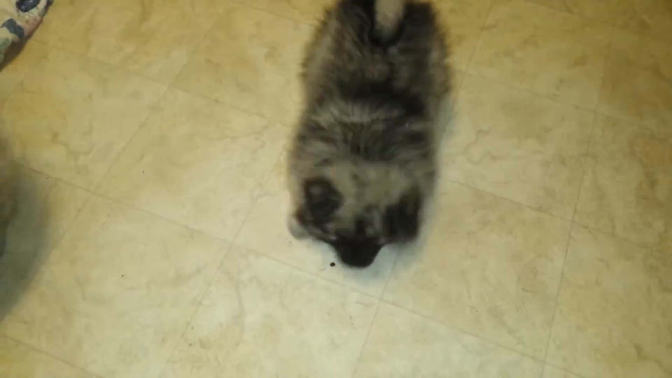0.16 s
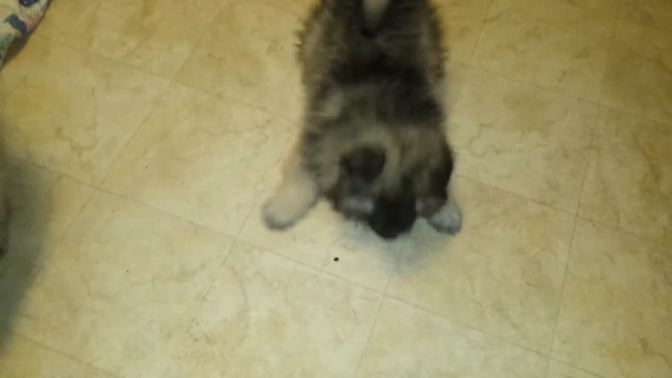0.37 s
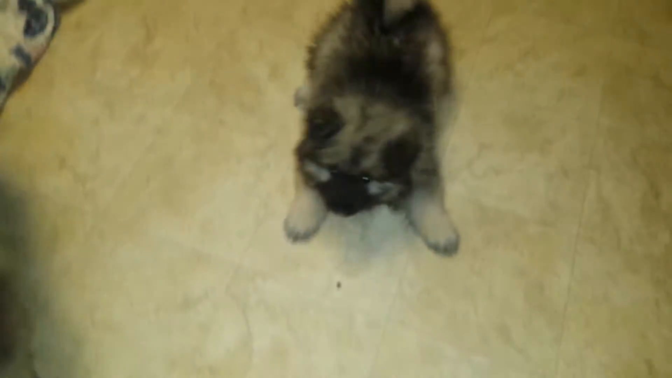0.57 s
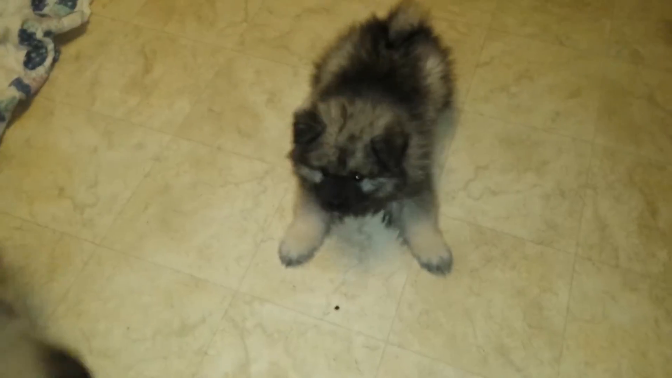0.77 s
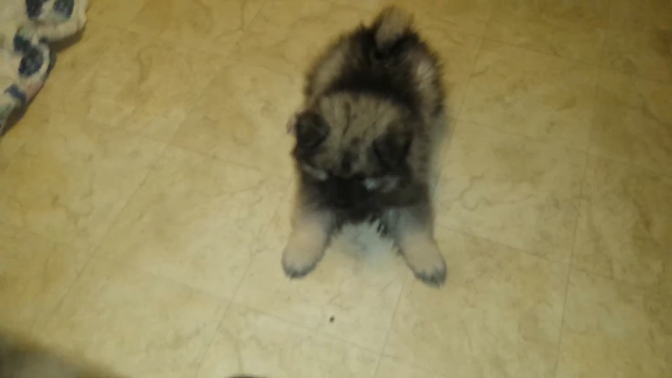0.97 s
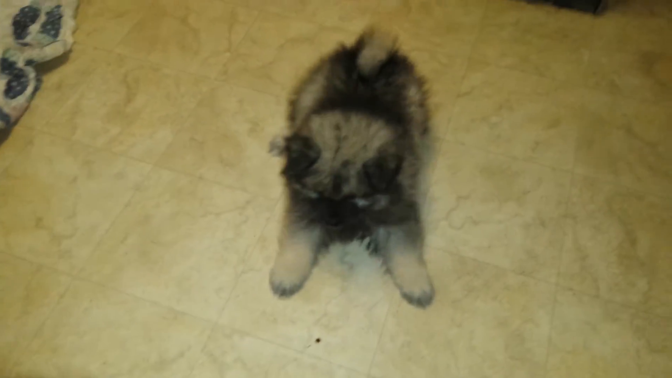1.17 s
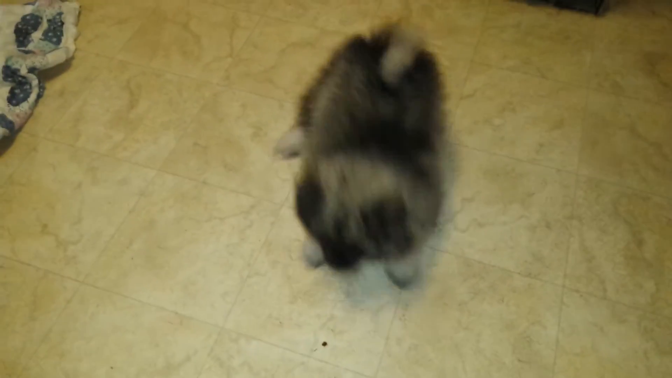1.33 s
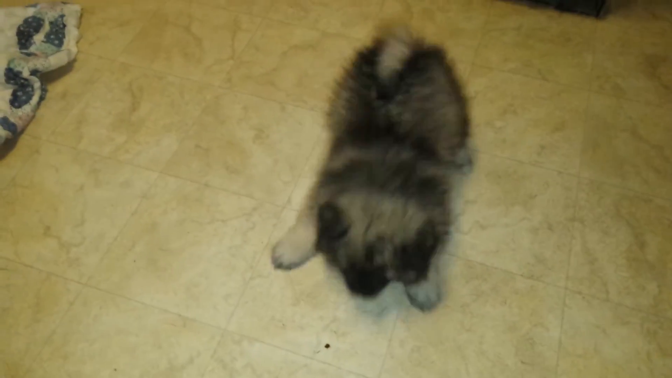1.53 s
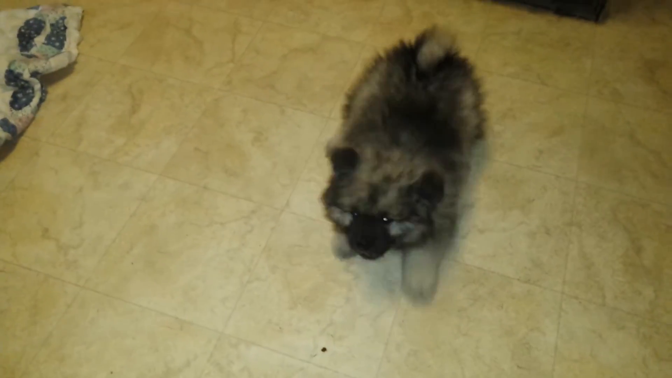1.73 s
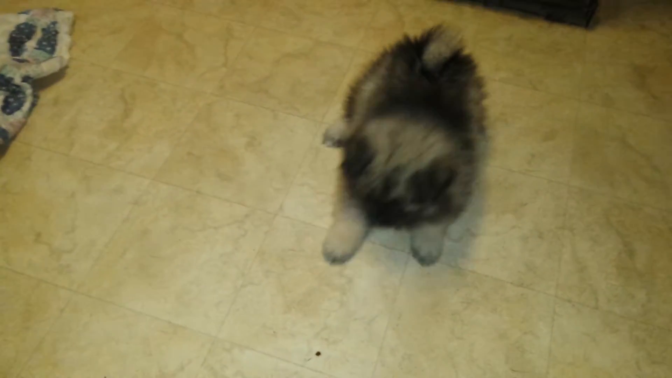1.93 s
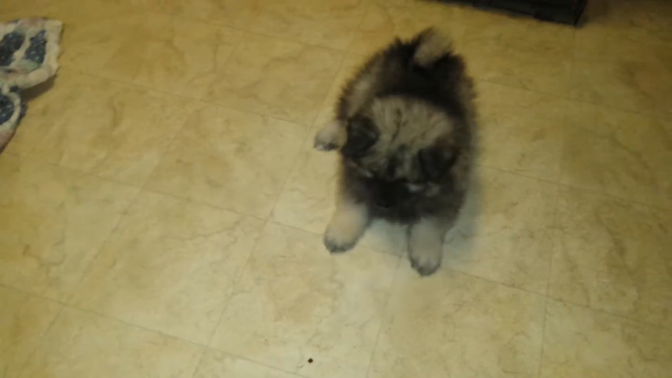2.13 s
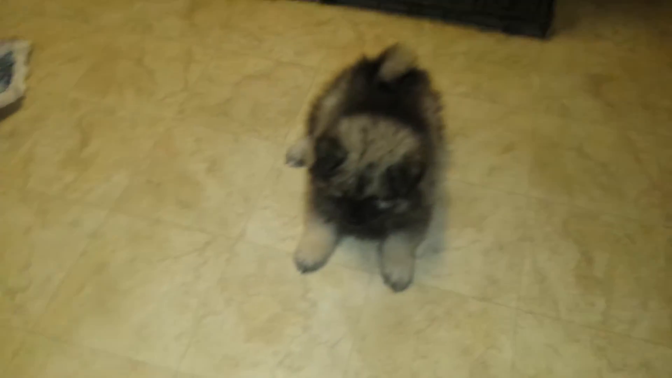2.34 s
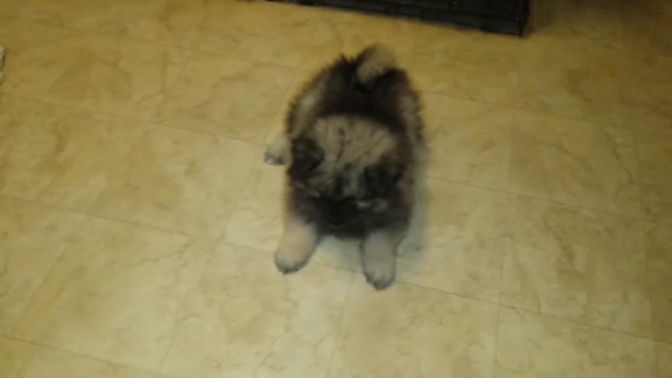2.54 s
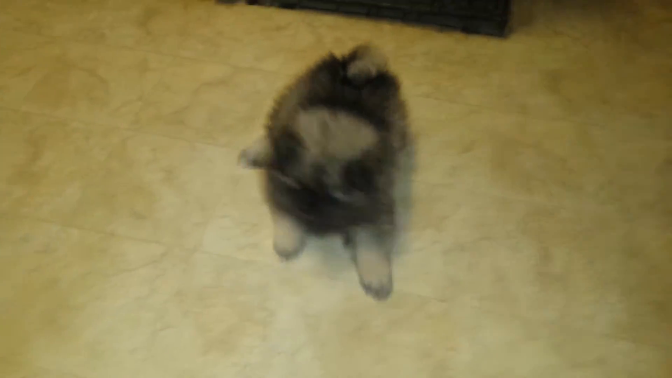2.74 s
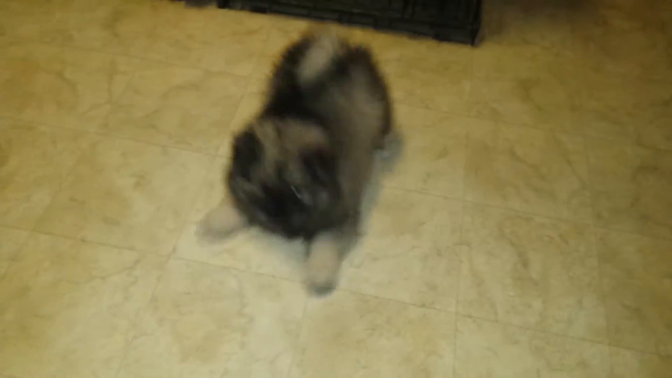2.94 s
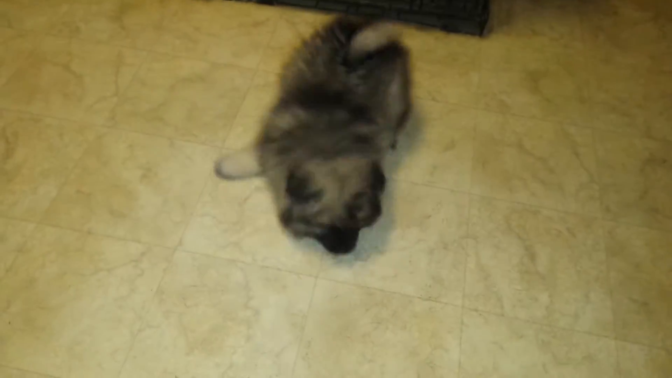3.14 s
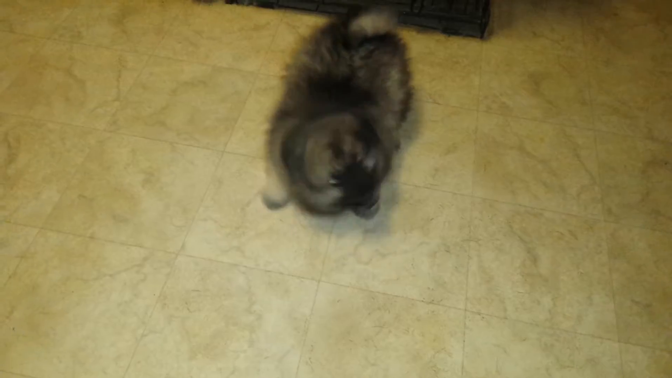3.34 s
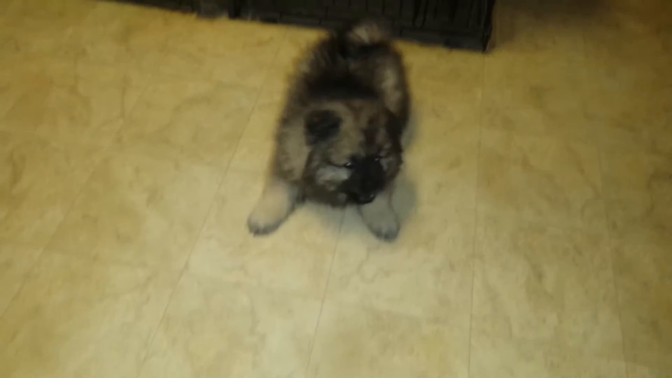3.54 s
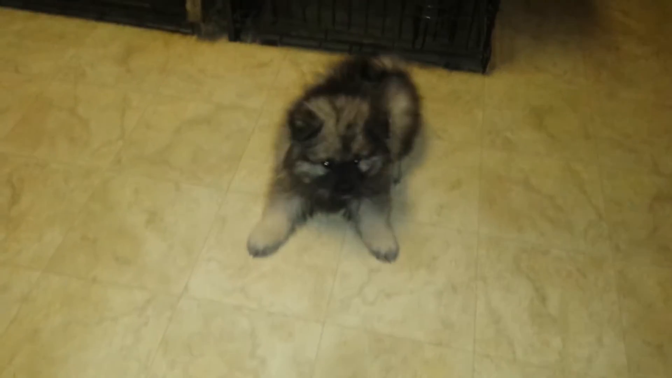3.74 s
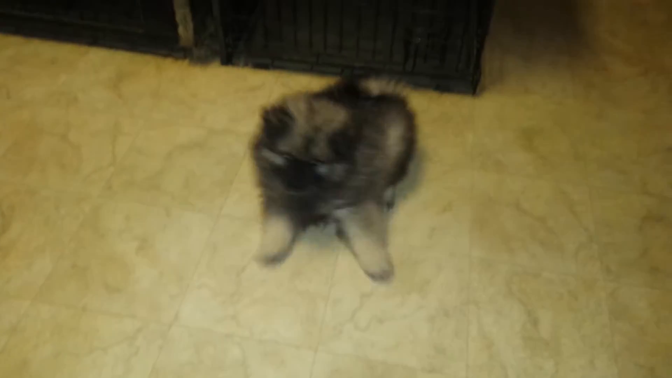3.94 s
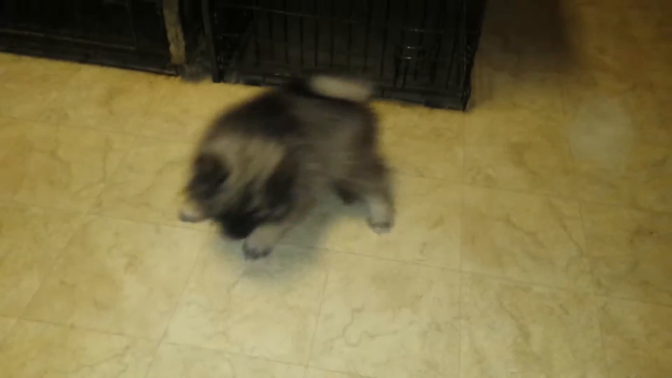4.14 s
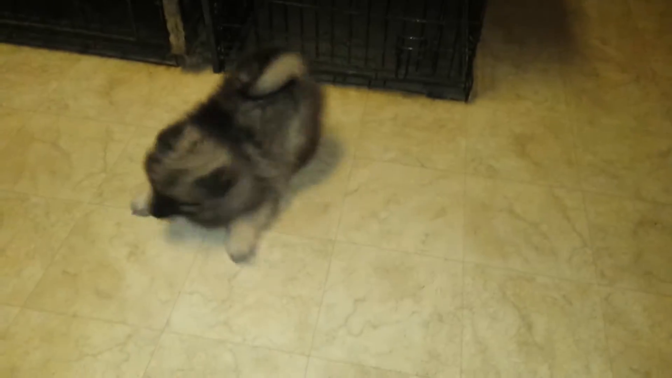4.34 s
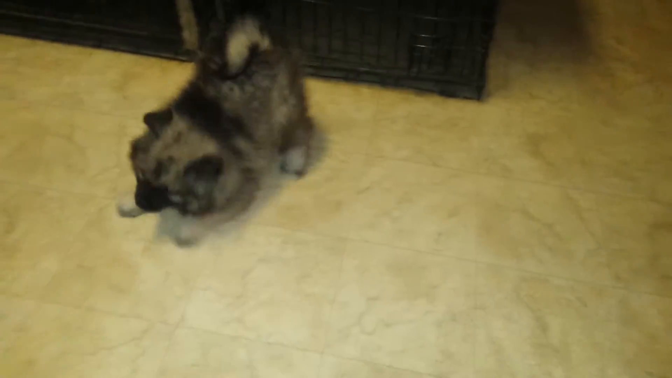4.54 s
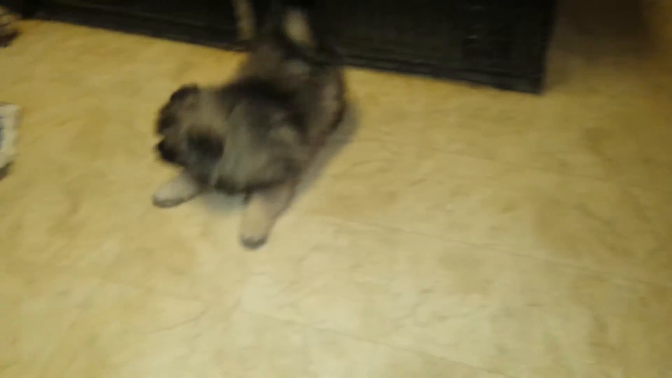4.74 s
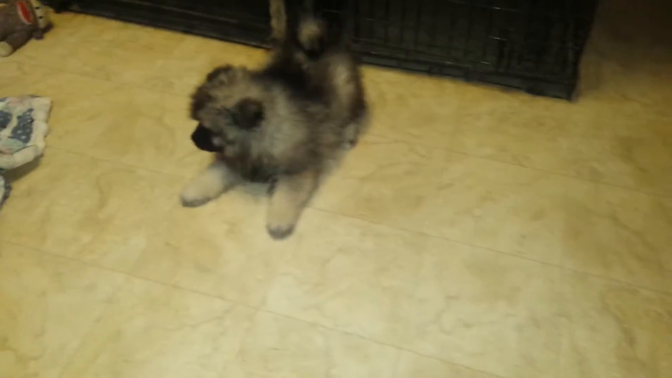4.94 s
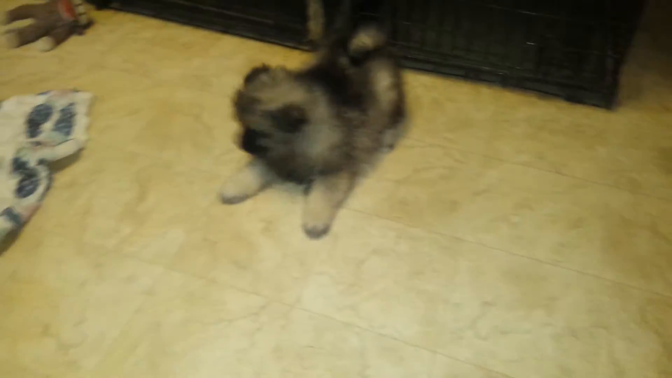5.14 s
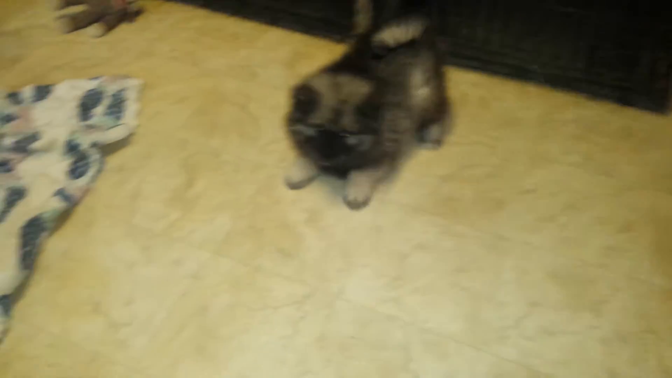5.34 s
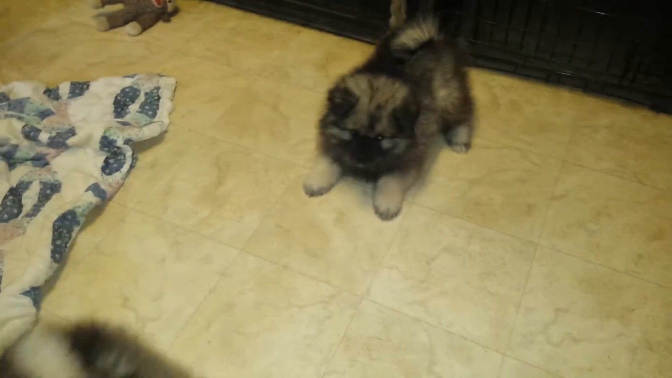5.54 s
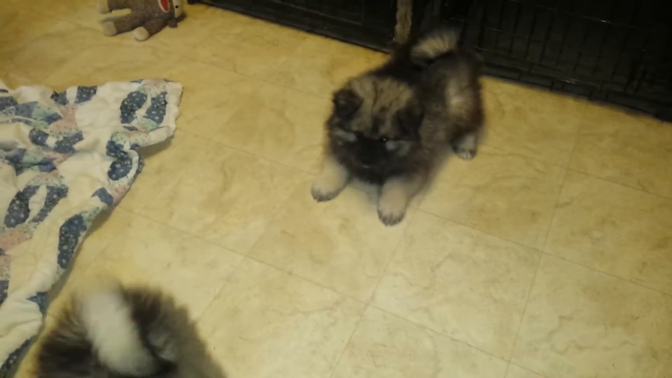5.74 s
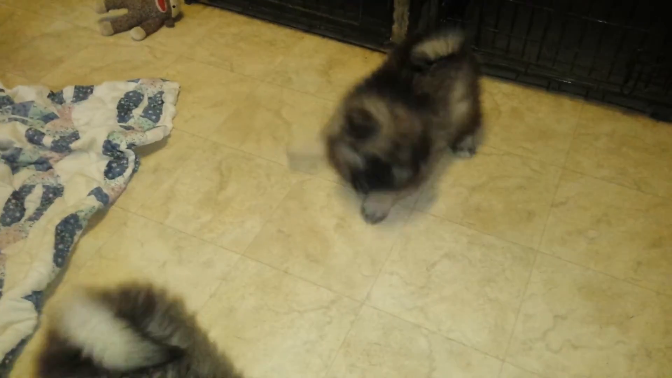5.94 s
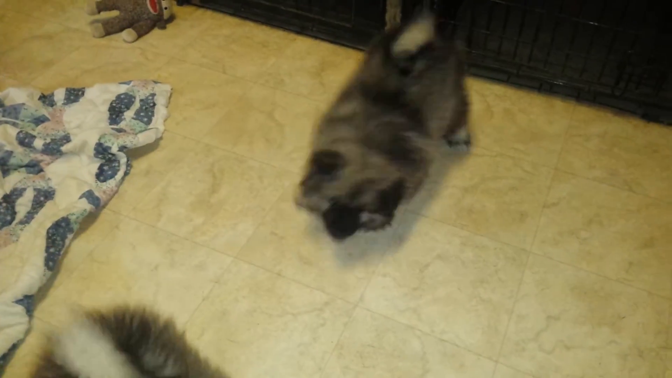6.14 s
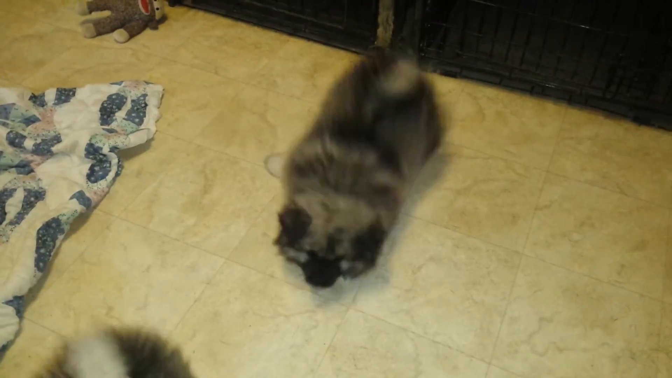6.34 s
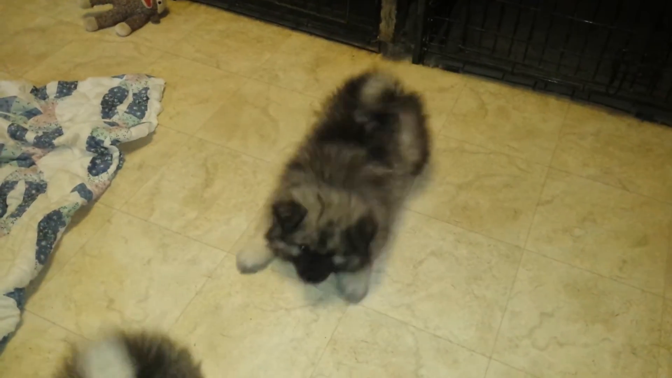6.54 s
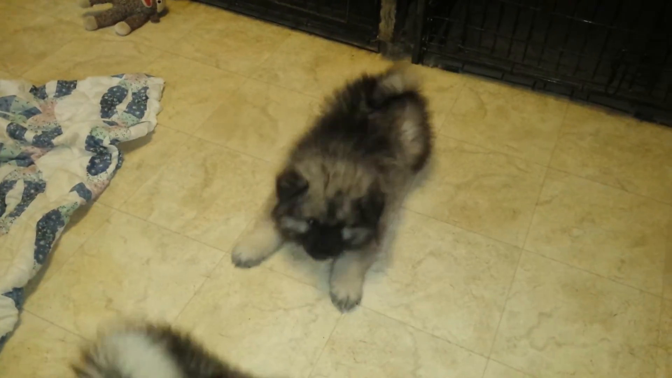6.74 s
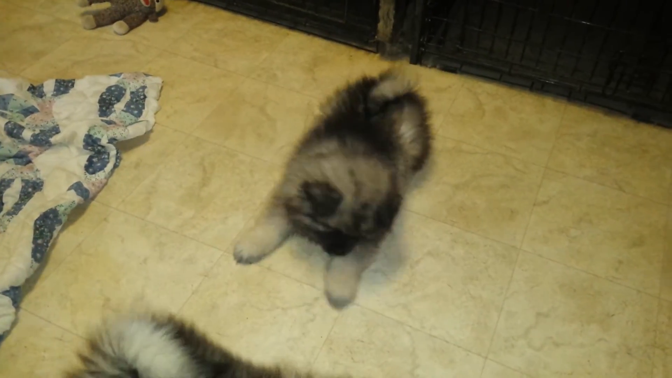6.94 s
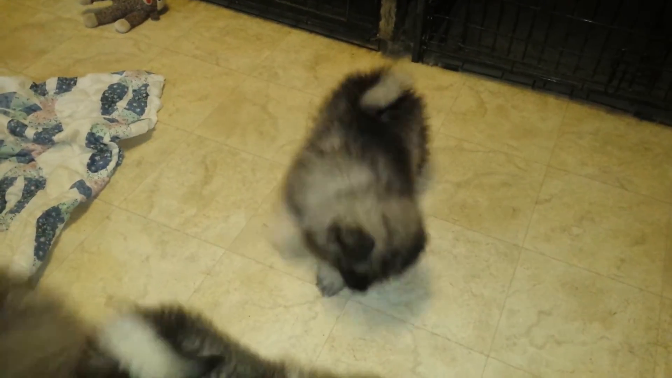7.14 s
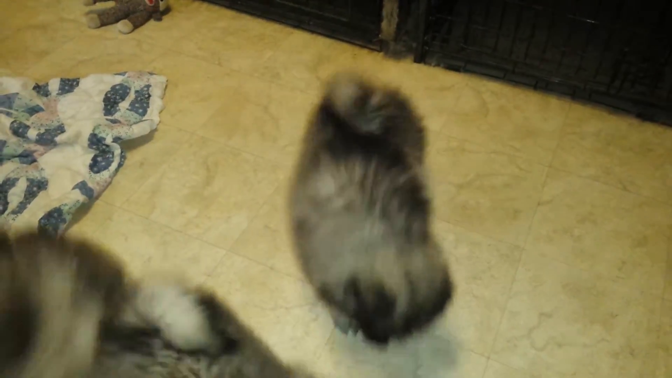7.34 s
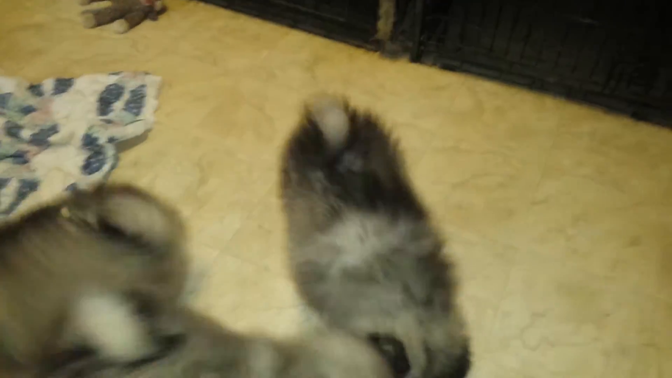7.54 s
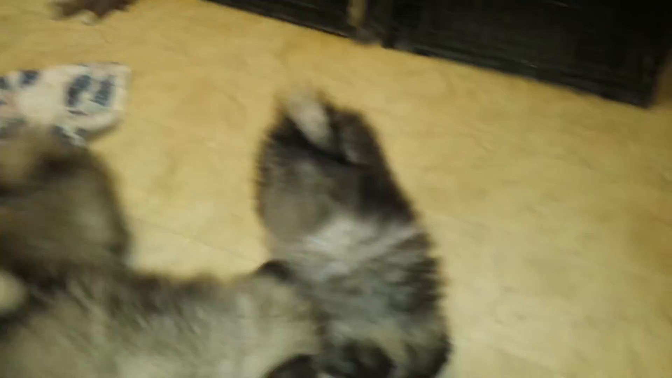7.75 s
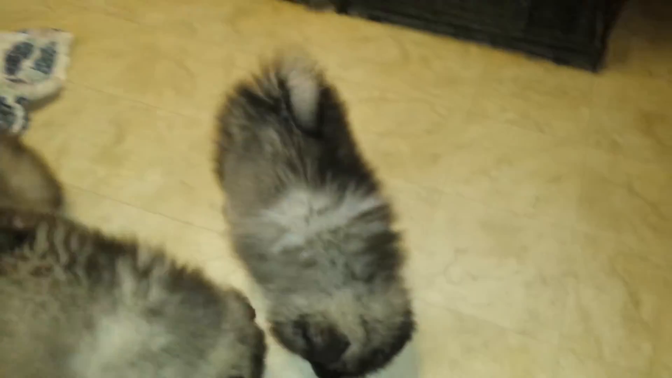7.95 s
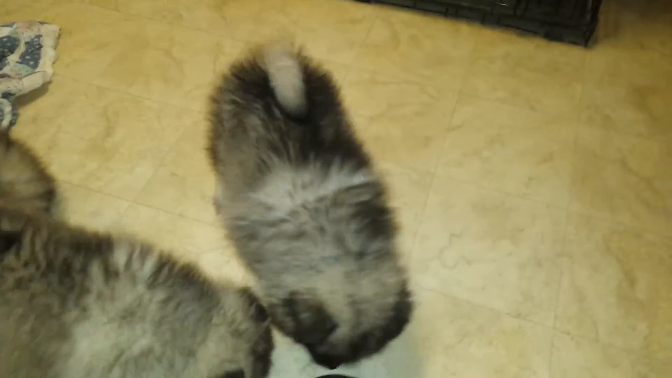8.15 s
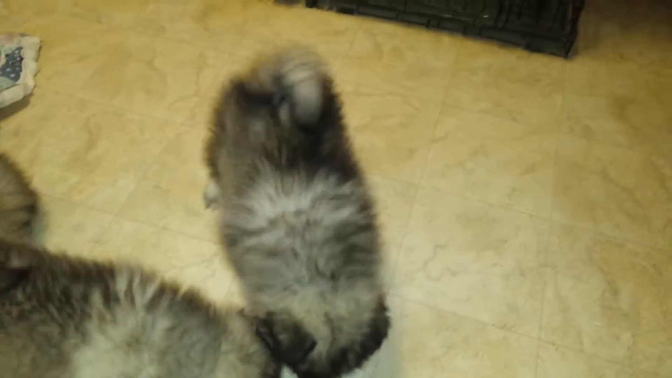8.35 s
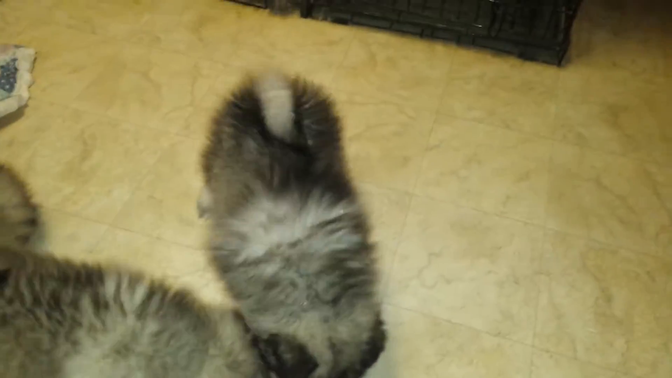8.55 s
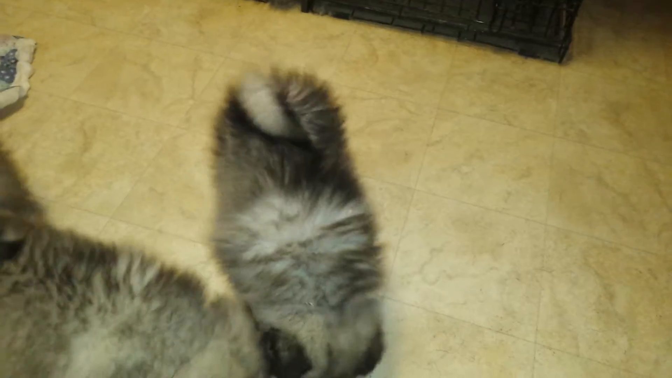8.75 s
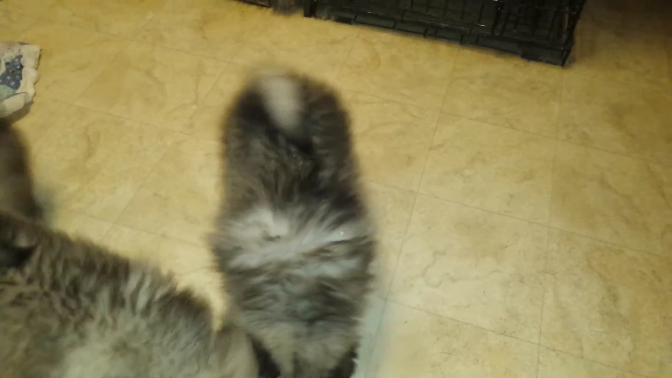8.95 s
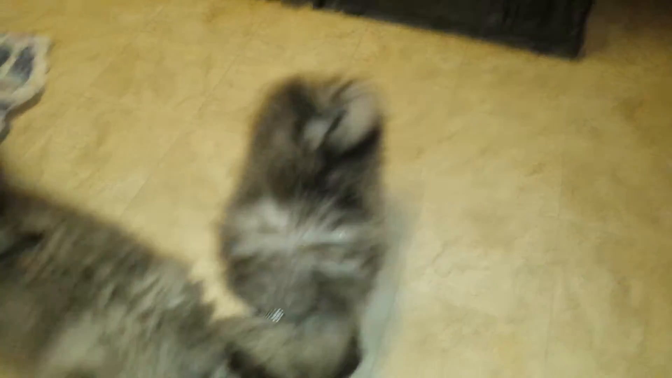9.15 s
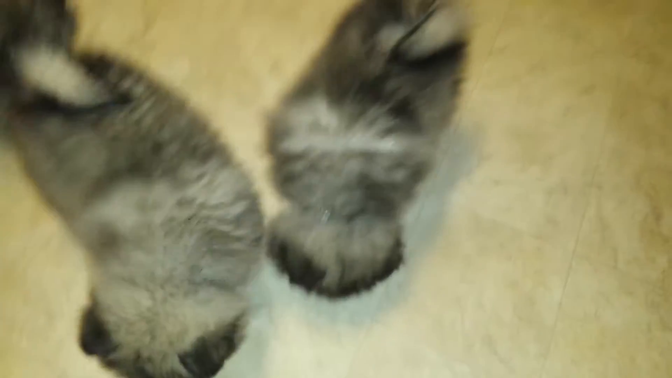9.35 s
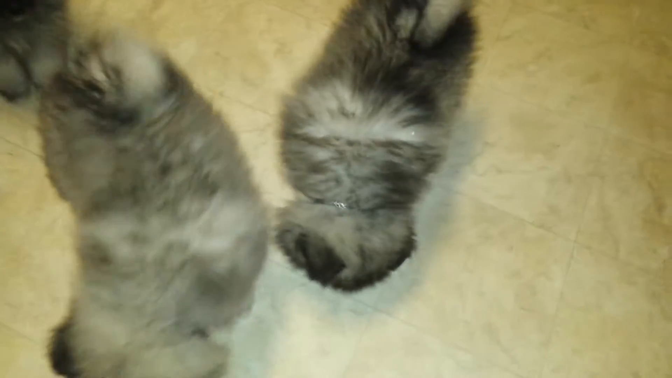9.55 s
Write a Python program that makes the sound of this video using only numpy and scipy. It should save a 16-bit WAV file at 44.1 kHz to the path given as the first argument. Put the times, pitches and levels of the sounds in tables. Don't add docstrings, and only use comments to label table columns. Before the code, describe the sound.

In a small, hard-surfaced kitchen, a close stereo microphone hears a low unsteady appliance hum and airy hiss. Paws slide at 0.1 seconds, then three quick, high puppy yaps come at 0.2, 0.4 and 0.6. Light claw ticks follow, then two yaps at 1.4 and 1.7. A faint grunt, lunge and thump near 2.9 lead into three barks from 3.0 to 3.6. Scuffles, ticks and tiny pad squeaks fill 3.9 to 5.6, around one bark at 4.6, turned away and more roomy, and a low soft grunt at 5.25. Three rapid barks run from 6.0 to 6.4, and a last higher, breathier one comes at 6.7. From 7.3 onward there is only movement: drags, fur rustle, crisp claw clicks and soft thumps, busiest from 8.2 to 9.3. Background noise ducks under barks and gradually returns.

```python
import sys
import numpy as np
from scipy import signal
from scipy.fft import rfft, irfft, next_fast_len
from scipy.io import wavfile
from scipy.ndimage import uniform_filter1d, map_coordinates

SR = 44100
rng = np.random.default_rng(int(sys.argv[2]) if len(sys.argv) > 2 else 0)


def pcm_store(signal):
    levels = np.round(np.clip(np.atleast_2d(signal), -1, 1) * 32767)
    wavfile.write(sys.argv[1], SR, levels.astype(np.int16).T)


def makeup_ratio(level_db):
    decades = np.asarray(level_db, float) / 20
    return 10 ** decades


N = 423360
TOP_HZ = 15830

# frequency in Hz, level in dB.
HUM = [(129.2, -44.5), (209.9, -52.5), (646.0, -57), (802.1, -55.5), (866.7, -57)]
# frequency in Hz, level in dB per Hz.
AIR = [(15, -48.5), (25, -22), (119, 1.5), (173, -5.5), (246, -1), (1450, -17.5), (2360, -16.5),
       (4500, -30), (6550, -19), (11800, -47.5), (15500, -31.5)]
# frequency in Hz, likeness from 0 to 1.
ALIKE = [(60, 1), (600, 0.81), (1400, 0.077), (3000, 0.055), (7000, 0.23), (15000, .1)]
# peak in seconds, rise in seconds, fall in seconds, level in dB,
# weight of the low scrape in dB.
SLIDES = [
    (.13, 0.2, .12, -33.5, -7),
    (1.435, 0.0092, 0.039, -39.5, -4),
    (2.72, 0.31, 0.42, -51.5, -2),
    (2.959, 0.054, 0.17, -33, -6.5),
    (4.662, 0.032, 0.018, -33.5, -28),
    (5.977, 0.037, 0.045, -29, -4),
    (7.5, 0.31, 0.32, -46.5, -9),
    (7.839, 0.075, 0.09, -40, -10),
    (8.1, 0.1, 0.061, -45.5, -5.5),
    (8.9, 0.65, 0.73, -38, -7),
]
# peak in seconds,
# level in dB, weight of the low scrape in dB.
PANTS = [(2.03, -57, -18.5), (2.25, -63, 0), (2.38, -84, -5.5), (2.512, -85, -9.5), (3.93, -48, -4.5),
         (4.057, -43.5, -7.5), (4.24, -45, -0.5), (4.38, -46.5, -6), (4.497, -46.5, -2),
         (5.01, -48.5, -8.5), (5.06, -54, -6), (5.19, -48, -14), (5.316, -44, 2.5), (5.46, -48.5, -6.5),
         (5.63, -65.5, -16.5), (7.021, -50, -4), (7.22, -42, -6.5), (7.338, -55, 1), (8.265, -40.5, -3),
         (8.431, -44.5, -5.5), (8.57, -35, -16), (8.71, -32.5, -15.5), (8.9, -59, -5),
         (9.121, -37.5, -6), (9.238, -43.5, -5.5), (9.451, -36, -22.5), (9.59, -53.5, -5),
         (1.411, -54, -14), (8.47, -43, -8), (9.03, -49, -7), (9.34, -49, -3), (3.3, -48.5, -5)]
# frequency in Hz, level in dB per Hz.
FUR = [(3000, -5.5), (4300, -4.5), (5600, -3.5), (6700, 7), (7700, 0), (10000, -8.5), (12500, -18.5),
       (15500, -20.5)]
# frequency in Hz, level in dB per Hz.
SCRAPE = [(400, -20.5), (900, -10), (1600, -7), (2400, 5.5), (2900, 1.5), (3500, -22.5), (5000, -37)]
# start in seconds, held part in seconds, effort in dB,
# swell while held in dB, fading part in seconds.
CALLS = [(.2, .14, -10, -4, .049), (.408, 0.11, -10, -5.5, 0.065), (.615, 0.1293, -13, -2.5, 0.048),
         (1.43, .12, -14.5, -1, .04), (1.7, .12, -11.5, 1, 0.039), (3.046, .14, -12, -2.5, 0.02),
         (3.315, .13, -12, -3, 0.056), (3.545, .13, -13, -5, .025), (4.638, .145, -9, -3.5, 0.037),
         (5.975, .115, -12.5, 0, 0.022), (6.137, .12, -13, -3, 0.088), (6.352, .14, -12.5, -2.5, 0.0042),
         (6.692, .135, -17.5, -0.5, .075), (2.901, .11, -38.5, 1.5, .05), (5.255, .059, -30.5, -10, .04)]
# noise share at the burst (0-1), noise share after it (0-1),
# burst length in seconds, half-pitch share (0-1), half-pitch length in seconds.
VOICING = [(.5, .1, .05, .4, .12), (.4, .04, .025, .12, .07), (.2, .05, .02, .19, .062),
           (.3, .09, .045, .5, .075), (.6, .03, .035, .12, .08), (.6, .05, .05, .12, .07),
           (.85, .08, .055, .12, .1), (.35, .07, .03, .18, .06), (.35, .08, .03, .2, .06),
           (.8, .03, .052, .15, .1), (.1, .06, .06, .15, .07), (.15, .04, .02, .05, .05),
           (.2, .36, .062, .7, .06), (.9, .85, .05, 0, .01), (.1, .2, .03, 0, .01)]
# top in seconds after the start, top in Hz, rise width in seconds,
# fall width in seconds.
ARCHES = [(.088, 780, .088, .071), (.072, 808, .079, .066), (.098, 1015, .17, .08), (.093, 775, .078, .06),
          (.085, 785, .08, .06), (.088, 785, .075, .077), (.082, 800, .072, 0.078), (.08, 765, .11, .083),
          (.1, 752, .105, .15), (.081, 750, .072, .085), (.09, 792, .088, .086), (.082, 738, .09, .072),
          (.078, 1110, .105, .075), (.02, 360, .9, 0.76), (0.027, 238, 0.19, 0.13)]
# throat resonance at opening, midway and closing in dB,
# front of the mouth in dB, brightness in dB.
MUZZLE = [(9.5, -4, 12, 2.5, 5.5), (-18, -8, -1.5, -6.5, 0.5), (-16.5, 1.5, 0.5, -9, 3),
          (12, -3, -2.5, 2.5, 3), (-7, -1, -14.5, -10, 1), (11.5, 2.5, 14, -0.5, 5.5),
          (-8.5, -5, -6, -3.5, -1), (-10, 0, -7, -6.5, -3), (9.5, -8.5, -5, 3, 1.5),
          (-0.5, -4.5, -7.5, -6.5, 0.5), (4.5, 2, 5, 9, 8.5), (3.5, -12.5, 17.5, -13, 0),
          (-3.5, 1.5, -2.5, 12.5, 6.5), (34, -3, 3.5, -4, 0.5), (-0.5, -.5, -17.5, 11.5, 8)]
# upper throat in Hz, mouth in Hz, lower throat in dB,
# squareness of the falling arch, side cavity depth in dB.
TRACT = [(1146, 2300, -6, 2, 11.5), (1720, 2000, -5, 2.7, 11.5), (1040, 1600, 4.5, 2.2, 9.5),
         (1150, 2000, -6.5, 1.8, 9.5), (1413, 2190, -6.5, 2.2, 5), (1300, 2350, -8, 2, 5),
         (1132, 2300, -3, 2.4, 7.5), (1290, 2150, -5.5, 2.4, 9), (1260, 2230, -7, 1.8, 1.5),
         (1250, 2200, -3, 2.2, 3), (1246.4, 1700, -12, 2.4, 2.5), (1140, 1900, -27, 3, 7.5),
         (1120, 2364, -12, 1.9, -3.5), (1166, 2050, -2, 2, 18.5), (1170, 1740, -4, 1.6, 9)]
# attack in seconds, attack in dB, drop at the cut in dB,
# rounding of the fading pulses.
EDGES = [(.022, 15.5, 4, 1.2), (.024, 15, 5, 1.4), (0.026, 23, 8.5, .4), (0.045, 15.5, 5, 1.2),
         (0.032, 15.5, 12, 1.1), (0.031, 17, 5.5, 1.1), (0.025, 12.5, 8, 1.2), (0.035, 12.5, 3, 1.1),
         (.035, 11, 7.5, 1.1), (0.0066, 13.5, 9.5, 2), (0.013, 10, 5.5, 1.8), (.03, 16, 6, 0.74),
         (0.035, 14.5, 4, 1.3), (0.025, 12, 5.5, 1.1), (.019, 13, 11, 1.1)]
# centre in Hz, width in Hz, level in dB.
THROAT = [(446, 280, -20), (800, 725, -2.5), (1153, 612, 7)]
# centre in Hz, width in Hz, level in dB.
MOUTH = [(2045, 576, 9.5), (2932, 140, -7.5)]
# centre in Hz, width in Hz, level in dB.
TEETH = [(5040, 510, -11), (7300, 570, -18), (10150, 980, -23.5), (12760, 3900, -35.5)]
# middle in seconds, half length in seconds, beats per second,
# depth from 0 to 1.
FLUTTER = [
    (0.26, 0.015, 62, .6),
    (4.752, 0.079, 72, 0.3),
    (6.77, 0.02, 92, 0.7),
    (6.007, 0.024, 55, 0.8),
    (1.49, 0.041, 54, 0.4),
]
# middle in seconds, half length in seconds, change in dB.
ACCENTS = [(0.268, .014, 2), (.412, .003, 7.5), (.524, .009, 3.5), (.71, .022, 1.5), (1.487, .015, 2.5),
           (1.76, .004, -6), (3.095, .007, 4), (3.115, .003, 3.5), (3.393, .012, 3), (3.597, .01, 3),
           (4.688, .012, 3.5), (6.047, .009, 3), (6.243, .01, 2.5), (6.43, .015, 3), (6.476, .005, -6.5),
           (6.488, 0.0059, 5.5), (6.745, .008, -3), (6.77, .016, 2.5)]
# start in seconds, peak in dB.
PUFFS = [(1.436, -32.5), (1.7025, -34), (3.0605, -21.5), (3.339, -30.5), (4.65, -30.5), (5.998, -26.5),
         (6.383, -30), (6.7246, -30)]
# time in seconds, level in dB.
TURN = [
    (4.1, 0),
    (4.6, -7),
    (5, -7),
    (5.2, 0),
]
# time in seconds, left-right difference in dB.
SIDEWAYS = [(.9, -0.5), (1.3, -1), (3.2, 0), (3.56, 1), (3.9, -0.5), (4.4, -0.5)]
# left delay in seconds, right delay in seconds, level in dB.
FLOOR_ECHO = [(.0021, 0.0027, -10), (.0063, 0.005, -15), (.0098, .0121, -11.5)]
# frequency in Hz, time to fall 60 dB in seconds.
KITCHEN = [(200, 0.3), (1000, 0.4503), (3000, 0.41), (5000, 0.43), (10000, 0.31)]
# start in seconds, peak in dB, frequency in Hz.
JOLTS = [
    (1.005, -44, 54.7),
    (2.619, -42, 48),
    (7.839, -39, 45),
    (8.449, -46, 45),
    (8.899, -31, 45.3),
]
# start in seconds, peak in dB, frequency in Hz.
THUMPS = [(2.994, -26, 236), (4.161, -44, 244), (4.431, -40.5, 141), (4.66, -36.5, 258), (4.5, -46.5, 290),
          (3, -41, 333), (8.03, -39.5, 372), (7.558, -35, 216), (7.849, -33, 199.4), (8.028, -40, 132),
          (8.451, -25.5, 218), (8.458, -28, 149.5), (8.786, -29.5, 140), (8.899, -33, 233),
          (9.274, -38.5, 98)]
# start in seconds, peak in dB, knock of the toe in dB.
CLAWS = [(1.007, -38.5, 7), (1.1123, -39.5, -6), (1.281, -34.5, -11), (2.0762, -36.5, -22),
         (2.116, -32, -15), (2.617, -33, 12), (2.8456, -28.5, -4), (2.915, -31, 18), (3.9293, -29.5, -33),
         (4.1535, -30.5, -6.5), (4.1788, -29, -21), (4.2348, -28, -29), (4.3724, -32, -5.5),
         (5.006, -35, -20), (5.1726, -30, -25), (5.6257, -38.5, 0), (7.359, -23, -59), (7.548, -31, -1.5),
         (7.8391, -34.5, 13.5), (8.1713, -28, -7.5), (8.243, -25.5, -8), (8.252, -17.5, -16),
         (8.2932, -25.5, -18.5), (8.4341, -28, 2.5), (8.6584, -30, -16), (8.8005, -20, -4),
         (8.896, -21, 1.5), (8.968, -29, -1), (9.1147, -23, -31), (9.238, -23.5, -7), (9.5328, -38.5, -8.5),
         (1.3978, -40, -14.5), (4.325, -34.5, -14.5), (5.2714, -30.5, -8.5), (5.288, -28, -15.5),
         (5.9065, -35, -15), (7.0523, -36, -13)]
# start in seconds, length in seconds,
# frequency in Hz, level in dB.
SQUEAKS = [
    (4.167, 0.0675, 2604, -43.5),
    (4.374, 0.025, 2620, -43),
    (4.464, 0.076, 2200, -48),
    (5.036, 0.032, 2520, -41),
    (5.315, 0.04, 2260, -44),
    (5.507, 0.017, 2310, -48.5),
]
# frequency in Hz, left-right difference in dB.
LEAN = [(60, 4), (110, 2.5), (200, 3), (380, 0.5), (700, 4), (1290, 2), (2380, 1.5), (4400, 0.5),
        (8120, -1), (15000, -15.5)]


def unit(x):
    return x / np.sqrt(np.mean(x ** 2) + 1e-20)


def along(points, hz):
    f, v = np.transpose(points)
    return np.interp(np.log(hz + 1), np.log(f + 1), v)


def curve(rows, t):
    s, value = np.transpose(rows)
    return np.interp(t, s, value)


def wobble(rate, n=N):
    knots = rng.standard_normal(int(n * rate / SR) + 4)
    return map_coordinates(knots, [np.arange(n) * rate / SR])


def filtered(x, response):
    n = x.shape[-1]
    m = next_fast_len(n + 4096)
    return irfft(rfft(x, m) * response(np.fft.rfftfreq(m, 1 / SR)), m)[..., :n]


def resonant(x, modes):
    def response(f):
        return sum(makeup_ratio(db) * (1j * f * w / (c * c - f * f + 1j * f * w)) ** 2 for c, w, db in modes)
    return filtered(x, response)


def add_at(out, seconds, sound):
    out[round(seconds * SR):][:len(sound)] += sound


def rush(spectrum):
    def mid_side(hz):
        turn = np.arccos(np.clip(along(ALIKE, hz), -1, 1)) / 2
        return makeup_ratio(along(spectrum, hz)) * [np.cos(turn), np.sin(turn)]
    mid, side = filtered(rng.standard_normal((2, N)), mid_side)
    return unit(np.array([mid + side, mid - side]))


def duck():
    depth_db, smooth_s, hold_s, release_db_per_s = 20, 0.084, 0.76, 29
    t = np.arange(N) / SR
    pulls = []
    for s, held, _, _, fading in CALLS[:-2]:
        released = release_db_per_s * np.maximum(0, t - s - held - fading - hold_s)
        pulls.append((t > s) * np.minimum(0, released - depth_db - curve(TURN, s)))
    return uniform_filter1d(np.min(pulls, axis=0), size=round(smooth_s * SR))


def background():
    hum_db, air_db = -40.5, -41.5
    air_share, hiss_share, hiss_above_hz = 0.76, 0.34, 3800
    t, gain_db = np.arange(N) / SR, duck()
    drift = np.cumsum(0.02 * wobble(9)) / SR
    hum = 0
    for hz, db in HUM:
        hum = hum + makeup_ratio(db - HUM[0][1] + 3.4 * wobble(22)) * np.sin(2 * np.pi * hz * (t + drift))
    air, unsteady = rush(AIR), makeup_ratio(2.4 * wobble(6))
    low = filtered(air, lambda hz: 1 / (1 + (hz / hiss_above_hz) ** 2))
    air = makeup_ratio(air_share * gain_db) * low + makeup_ratio(-7.5 + hiss_share * gain_db) * (air - low)
    return makeup_ratio(hum_db + gain_db) * hum + makeup_ratio(air_db) * unsteady * air


def slides():
    pant_rise_s, pant_fall_s = 0.035, 0.052
    t = np.arange(N) / SR
    rustle = makeup_ratio(-54.5 + 0.046 * duck())
    fur, scrape = rustle, rustle * makeup_ratio(-8)
    pants = [(s, pant_rise_s, pant_fall_s, *rest) for s, *rest in PANTS]
    for s, rise, fall, db, low_db in list(SLIDES) + pants:
        swell = makeup_ratio(db) * np.exp(-((t - s) / np.where(t < s, rise, fall)) ** 2)
        fur = fur + swell
        scrape = scrape + swell * makeup_ratio(low_db)
    grain = makeup_ratio(2.5 * wobble(45) + 1.8 * wobble(400))
    fur_noise = unit(grain * rush(FUR))
    scrape_noise = unit(grain * rush(SCRAPE))
    return makeup_ratio(1.0) * fur * fur_noise + makeup_ratio(-1.5) * scrape * scrape_noise


def controls(t, call, arch, muzzle, edge, square):
    slack_share, arch_power = .3, 2.05
    cut_s, fade_db_per_s, db_per_octave = 0.014, 141.5, 1.5
    closed_db, midway = 14, 0.66
    (_, held, db, swell_db, _), (top, top_hz, rise, fall) = call, arch
    away = np.abs((t - top) / np.where(t < top, rise, fall))
    tension = np.exp(-away ** np.where(t < top, arch_power, square))
    hz = top_hz * (slack_share + (1 - slack_share) * tension)
    knots = [0, edge[0], held, held + cut_s]
    effort_db = db + np.interp(t, knots, [-edge[1], 0, swell_db, swell_db - edge[2]])
    effort_db = effort_db - fade_db_per_s * np.maximum(0, t - knots[-1])
    effort_db = effort_db + db_per_octave * np.log2(hz / top_hz)
    mouth_times = [0, edge[0], midway * held, held, knots[-1]]
    throat_db = np.interp(t, mouth_times, [closed_db, *muzzle[:3], closed_db])
    return hz, effort_db, throat_db


def glottis(t, hz, effort_db, held, rounding, burst, steady, length, half, half_length):
    fraying, fray_s = .2, .04
    scoop_s, scoop = 0.012, 2.1
    n = len(t)
    noisy = steady + (burst - steady) * np.exp(-(t / length) ** 4)
    noisy = np.clip(noisy + fraying * np.clip((t - held) / fray_s, 0, 1), 0, .95)
    jitter = (.005 + .06 * noisy) * wobble(250, n) + .014 * wobble(45, n)
    turn = 2 * np.pi * np.cumsum(hz * (1 + jitter)) / SR
    falling = t > t[np.argmax(effort_db)]
    slack = rounding * falling * np.clip((effort_db.max() - 4.0 - effort_db) / 8, 0, 2.2)
    slack = slack + np.clip((450 - hz) / 300, 0, .5)
    slack = slack + scoop * np.exp(-(t / scoop_s) ** 2)
    k = np.arange(1, 41)[:, None]
    broken = makeup_ratio(2.6 * np.array([wobble(50, n) for _ in k]))
    harmonics = broken * np.cos(k * turn) * (k * hz < TOP_HZ) * k ** -slack
    pulses = np.sum(harmonics, axis=0) * np.sqrt(hz / 10000)
    uneven = half * np.exp(-(t / half_length) ** 4)
    pulses = pulses * (1 + 2 * uneven * makeup_ratio(3 * wobble(60, n)) * np.cos(turn / 2))
    breath = unit(rng.standard_normal(n) * (1 + 0.42 * np.cos(turn))) * makeup_ratio(-7 * slack)
    return np.sqrt(1 - noisy) * pulses + np.sqrt(noisy) * breath, breath


def yap(call, arch, muzzle, tract, edge, voicing):
    end = call[1] + call[4]
    t = np.arange(0, end + 0.0088, 1 / SR)
    hz, effort_db, throat_db = controls(t, call, arch, muzzle, edge, tract[3])
    folds, breath = glottis(t, hz, effort_db, call[1], edge[3], *voicing)
    shut = min(1, (hz.max() / 590) ** 1.25)
    throat = [(c * shut, w * np.sqrt(shut), db + tract[2]) for c, w, db in THROAT[:2]]
    _, upper_width, upper_db = THROAT[2]
    throat.append((tract[0] * shut, upper_width * np.sqrt(shut), upper_db))
    voice = makeup_ratio(throat_db) * resonant(folds, throat)
    voice = voice + resonant(folds, [(tract[1], *MOUTH[0][1:])])
    voice = voice + makeup_ratio(muzzle[3]) * resonant(folds, MOUTH[1:])
    power = np.abs(uniform_filter1d(voice ** 2, size=1100)) + 0.0022 * np.mean(voice ** 2)
    hiss = (folds + .3 * breath) * makeup_ratio(4 * wobble(60, len(t)))
    voice = (voice + makeup_ratio(muzzle[4]) * resonant(hiss, TEETH)) / np.sqrt(power)
    edges = np.clip(t / 0.0032, 0, 1) * np.clip((end + 0.021 - t) / 0.0041, 0, 1)
    return voice * makeup_ratio(effort_db - 1 + 1.1 * wobble(70, len(t))) * edges


def flutter(t):
    gain = np.ones(len(t))
    for s, length, rate, depth in FLUTTER:
        beat = np.exp(-((t - s) / length) ** 4) * np.cos(2 * np.pi * rate * (t - s))
        gain = gain * (1 + np.clip(depth, 0, 1) * beat)
    accent_db = sum(db * np.exp(-((t - s) / length) ** 2) for s, length, db in ACCENTS)
    return gain * makeup_ratio(accent_db)


def puffs():
    out, t = np.zeros(N), np.arange(1300) / SR
    for s, db in PUFFS:
        add_at(out, s, makeup_ratio(db + 25.5 - 60 * t / .04) * rng.standard_normal(len(t)))
    return resonant(out, TEETH)


def puppy():
    out = np.zeros(N)
    for *parts, tract, edge, voicing in zip(CALLS, ARCHES, MUZZLE, TRACT, EDGES, VOICING):
        def hollow(hz):
            return makeup_ratio(-1.25 * tract[4] * np.exp(-((hz - 3850) / 570) ** 6))
        add_at(out, parts[0][0], filtered(yap(*parts, tract, edge, voicing), hollow))
    return out * flutter(np.arange(N) / SR) + puffs()


def kitchen(x):
    hz, t, z = signal.stft(rng.standard_normal((2, SR // 2 + SR // 4)), SR, nperseg=256)
    tail = signal.istft(z * makeup_ratio(-60 * t / along(KITCHEN, hz)[:, None]), SR, nperseg=256)[1]
    tail = tail + filtered(tail[::-1], lambda f: np.clip(along(ALIKE, f), 0, 1) ** 3)
    late = np.pad(x, (300, 0))[None]
    return signal.fftconvolve(late, tail / np.linalg.norm(tail[0]), axes=1)[:, :N]


def thumps():
    out, t = np.zeros(N), np.arange(4000) / SR
    for s, db, hz in list(THUMPS) + list(JOLTS):
        ring = np.sin(2 * np.pi * hz * t)
        ring = ring + 0.45 * np.sin(2 * np.pi * 2.7 * hz * t) * makeup_ratio(-60 * t / 0.038)
        add_at(out, s, makeup_ratio(db + 11.0 - 60 * t / 0.036) * (1 - np.exp(-t / 0.0017)) * ring)
    return out


def claws():
    tick, knock, t = np.zeros(N), np.zeros(N), np.arange(600) / SR
    for s, db, knock_db in CLAWS:
        crack = np.sign(rng.standard_normal((2, len(t))))
        add_at(tick, s, makeup_ratio(db + 5 - 60 * t / 0.005) * crack[0])
        add_at(knock, s, makeup_ratio(db + knock_db + 8.5 - 60 * t / 0.0081) * crack[1])
    bright = resonant(tick, [(6600, 1100, 12.0), (11700, 5000, -13.0)])
    return bright + resonant(knock, [(950, 460, 0.7)])


def squeaks():
    out = np.zeros(N)
    for s, length, hz, db in SQUEAKS:
        n = round(length * SR)
        turn = 2 * np.pi * np.cumsum(hz * (1 + 0.032 * wobble(378, n))) / SR
        add_at(out, s, makeup_ratio(db - 0.5 + 2.8 * wobble(92, n)) * np.sqrt(np.hanning(n)) * np.sin(turn))
    return out


def apart(x):
    return np.array([np.roll(x, 2), x])


def scene():
    t = np.arange(N) / SR
    voice, paws = puppy(), claws() + thumps() + squeaks()
    near = apart(voice)
    for *lags, db in FLOOR_ECHO:
        near = near + makeup_ratio(db) * np.array([np.roll(voice, round(s * SR)) for s in lags])
    facing = makeup_ratio(curve(TURN, t))
    aim = makeup_ratio(np.array([[.5], [-.5]]) * curve(SIDEWAYS, t))
    barking = aim * (facing * near + makeup_ratio(-3.0) * kitchen(voice))
    scuffling = apart(paws) + makeup_ratio(-2.5) * kitchen(paws) + slides()
    return barking + scuffling + background()


def roll_off(x):
    return signal.sosfilt(signal.butter(12, 15830, fs=SR, output="sos"), x)


def record(dry):
    def ports(hz):
        balance = makeup_ratio(np.array([[.5], [-.5]]) * along(LEAN, hz))
        return balance * (hz < TOP_HZ) * hz / np.hypot(hz, 40)
    x = filtered(dry, ports)
    x = x / (1 + np.abs(x / 1.05) ** 6) ** (1 / 6)
    return roll_off(x)


dry = scene()
out = record(dry)
pcm_store(out)
```